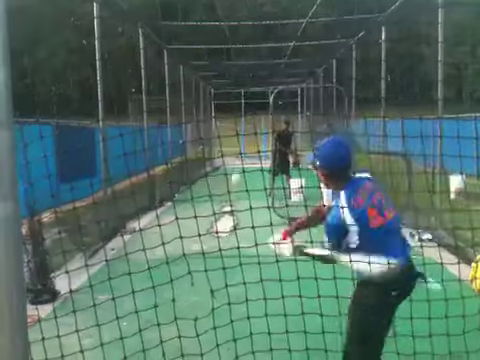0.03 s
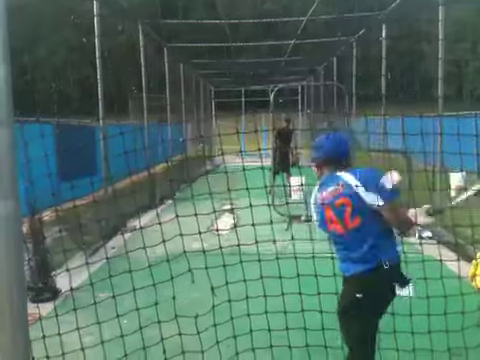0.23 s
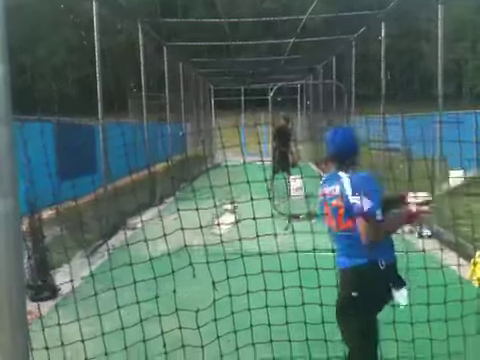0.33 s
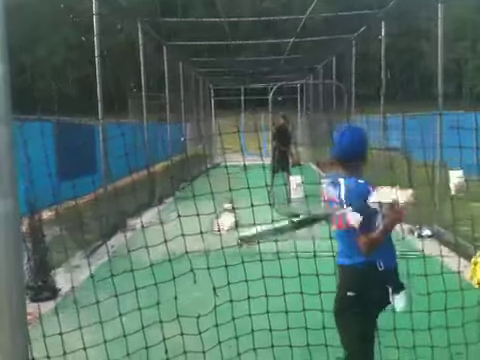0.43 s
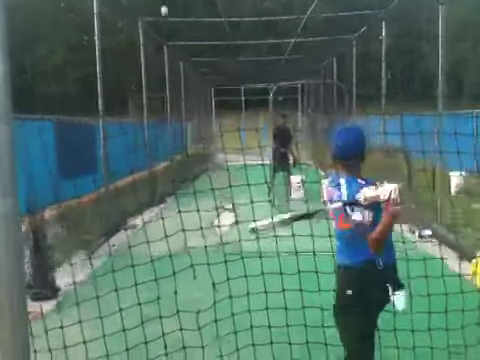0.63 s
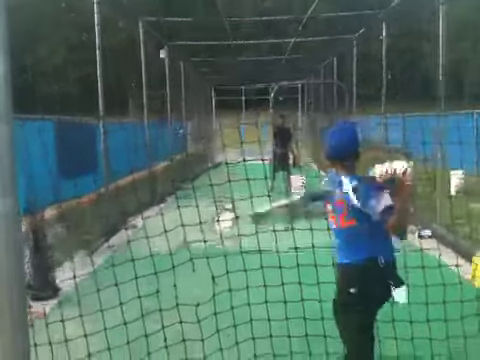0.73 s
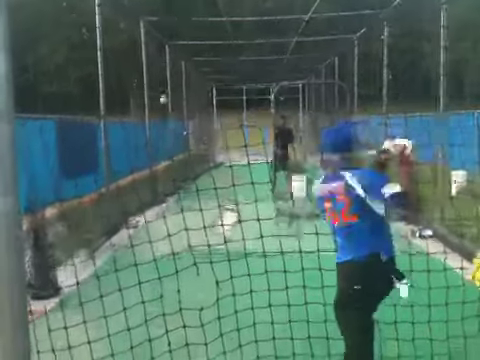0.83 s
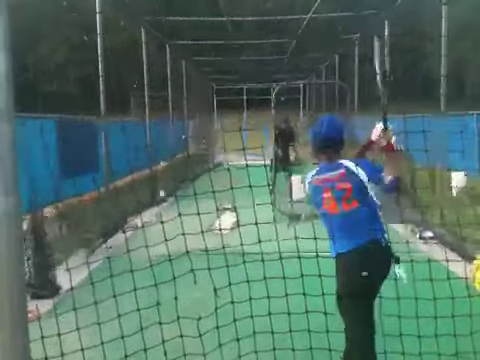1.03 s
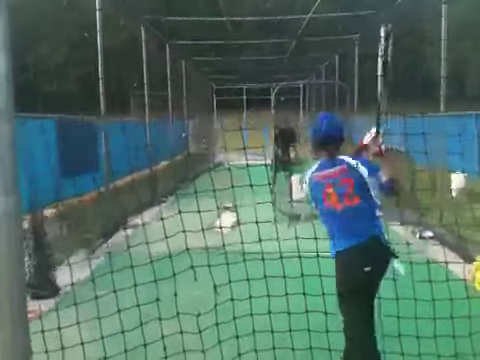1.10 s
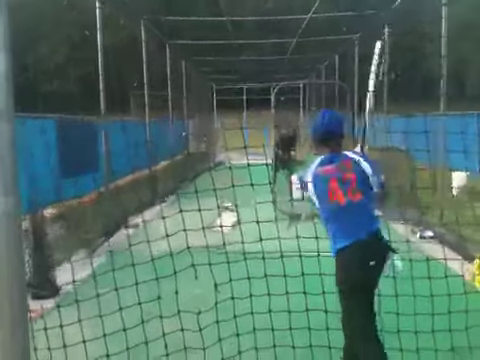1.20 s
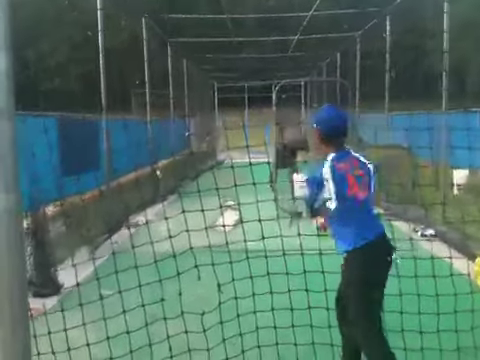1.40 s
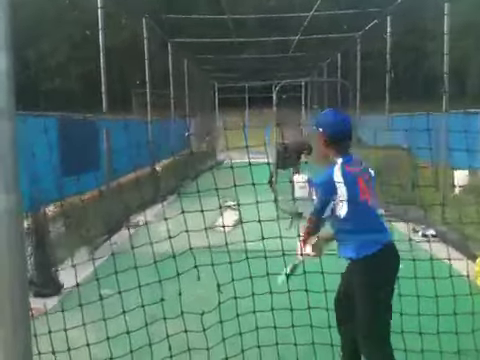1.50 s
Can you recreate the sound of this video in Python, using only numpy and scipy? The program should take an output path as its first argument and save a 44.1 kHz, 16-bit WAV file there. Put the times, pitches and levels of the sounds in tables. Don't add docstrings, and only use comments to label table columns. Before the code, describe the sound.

Sharp metallic bat hit with a short bending ring and clattery echoes, then a soft ball thud

```python
import sys
import numpy as np
from scipy import signal
from scipy.io import wavfile
from scipy.ndimage import uniform_filter1d

SR = 44100
rng = np.random.default_rng(int(sys.argv[2]) if len(sys.argv) > 2 else 0)


def materialize(psi):
    bounded = np.clip(np.atleast_2d(psi).T, -1, 1)
    quanta = np.round(bounded * 32767).astype(np.int16)
    wavfile.write(sys.argv[1], SR, quanta)


def convert_level_to_amplitude(level_db):
    exponent = np.asarray(level_db, float) / 20
    return 10 ** exponent


N = 68355
HIT_S, HIT_DB = 0.2081, -2


def evened(x):
    return x / np.sqrt(np.mean(x ** 2) + 1e-20)


def read(points, hz):
    f, value = np.transpose(points)
    return np.interp(np.log(hz + 1), np.log(f + 1), value)


def add(mix, s, sound):
    part = mix[round(s * SR):][:len(sound)]
    part += sound[:len(part)]


def band(x, hz, width):
    lo = np.sqrt(hz ** 2 + width ** 2 / 4) - width / 2
    hi = min(lo + width, SR / 2.2)
    return signal.sosfilt(signal.butter(2, [lo, hi], "band", fs=SR, output="sos"), x)


def ring(modes, t):
    return sum(convert_level_to_amplitude(db - 60 * t / t60) * np.sin(2 * np.pi * hz * t) for hz, db, t60 in modes)


def colour(points):
    gain = convert_level_to_amplitude(2 * read(points, np.linspace(0, SR / 2, 129)))
    pulse = signal.minimum_phase(signal.firwin2(255, np.linspace(0, 1, 129), gain))
    return pulse / np.linalg.norm(pulse)


def smoothed(x, first, second):
    return uniform_filter1d(uniform_filter1d(x, first, axis=0), second, axis=1)


def wash():
    # f/Hz, level/dB per Hz
    spectrum = [(60, -19), (220, -1), (700, -17), (1600, -17), (2900, -24), (4500, -18), (8000, -27),
                (16500, -30.5)]
    wash_db, patchy_db = -59, 1.2
    frames, hz = N // 128 + 5, np.fft.rfftfreq(512, 1 / SR)
    a, b, patches = rng.standard_normal((frames, 257, 3)).T
    patches = evened(smoothed(patches, 8, 20))
    z = (a + 1j * b) * convert_level_to_amplitude(read(spectrum, hz)[:, None] + patchy_db * patches)
    return convert_level_to_amplitude(wash_db) * evened(signal.istft(z, nperseg=512, noverlap=384)[1][:N])


def swishes():
    # start t/s, peak t/s, end t/s, level/dB, centre f/Hz, width f/Hz
    gusts = [(.11, .16, .187, -51.5, 2100, 1300), (.115, .15, .185, -59, 6200, 2500),
             (.125, .172, .19, -60, 11500, 8000), (.005, .018, .035, -56, 900, 2500),
             (.5, .6, .75, -62, 1300, 1800), (.92, 1.0, 1.085, -66, 6000, 10000),
             (.2035, .206, .209, -31, 4000, 12000), (1.02, 1.05, 1.075, -58, 1700, 900)]
    t, out = np.arange(N) / SR, np.zeros(N)
    for start, peak, end, db, hz, width in gusts:
        grain = convert_level_to_amplitude(2.5 * evened(uniform_filter1d(rng.standard_normal(N), 60)))
        swell = np.sin(np.pi / 2 * np.interp(t, [start, peak, end], [0, 1, 0]))
        out += convert_level_to_amplitude(db) * swell * evened(grain * band(rng.standard_normal(N), hz, width))
    return out


def footsteps():
    # centre t/s, length t/s, level/dB, f/Hz
    knocks = [(0.012, .012, -51, 240), (0.08, .03, -49.5, 170), (0.273, .025, -53.5, 200),
              (.9, .05, -51, 168)]
    # t/s, level/dB
    grit = [(0.132, -62), (0.164, -50), (0.945, -60), (.954, -53), (1.033, -55), (1.039, -44.5),
            (1.052, -44.5), (1.055, -42), (1.065, -46.5), (1.08, -60), (1.303, -53.5), (1.418, -52.5)]
    grit_t60_s = 0.011
    t, out = np.arange(N) / SR, np.zeros(N)
    for s, length, db, hz in knocks:
        out += convert_level_to_amplitude(db) * np.exp(-((t - s) / length) ** 2) * np.sin(2 * np.pi * hz * t)
    for s, db in grit:
        snap = rng.standard_normal(600) * convert_level_to_amplitude(-60 * t[:600] / grit_t60_s)
        body = 2 * band(snap, 1750, 600)
        add(out, s, convert_level_to_amplitude(db) * (band(snap, 6500, 9000) + body))
    return out


def barrel():
    barrel_hz = [670, 888, 1303, 1670, 2480, 3400, 4177, 5220, 5680, 6940, 8330, 9685, 10800, 15110]
    # level/dB, t60/s
    decays = [(-4.5, .03), (-9, 0.04), (2.5, 0.021), (-3, 0.029), (-10.5, 0.041), (-16, 0.063),
              (-6.5, 0.13), (-12, 0.08), (-18, 0.1), (-26.5, .06), (-24, 0.01), (-18, 0.36), (-13.5, .02),
              (-19, .02)]
    # f/Hz, level/dB, t60/s
    squash = [(476.3, -6, 0.015)]
    swell_s, turn_s = 0.0018, 0.015
    t, out = np.arange(SR // 5) / SR, np.zeros(N)
    modes = [(hz, db, t60) for hz, (db, t60) in zip(barrel_hz, decays)]
    envelope = (1 - np.exp(-t / swell_s)) * np.exp(-(t / turn_s) ** 4)
    add(out, HIT_S, convert_level_to_amplitude(HIT_DB) * envelope * (ring(modes, t) - ring(squash, t)))
    return out


def crack():
    # f/Hz, level/dB
    crack_spectrum = [(150, -30.5), (450, -9.5), (1000, -6), (1500, -5.5), (3000, -10), (4500, 1.5),
                      (11000, -12), (16500, -13.5)]
    crack_db, crack_t60_s, click_db, crush_hz = -6.5, 0.025, 9, 1800
    t, out = np.arange(2048) / SR, np.zeros(N)
    click = colour(crack_spectrum)
    burst = rng.standard_normal(2048) * convert_level_to_amplitude(-60 * t / crack_t60_s)
    burst = signal.sosfilt(signal.butter(2, crush_hz, "high", fs=SR, output="sos"), burst)
    blow = convert_level_to_amplitude(crack_db) * signal.lfilter(click, 1, burst)
    add(blow, 0, convert_level_to_amplitude(click_db) * click)
    add(out, HIT_S, convert_level_to_amplitude(HIT_DB) * blow)
    return out


def moving_note(rows, pitch):
    s, db = np.transpose(rows)
    t = np.arange(s[0], s[-1], 1 / SR)
    edge = np.clip(np.minimum(t - s[0], s[-1] - t) / 0.003, 0, 1)
    level = np.sqrt(2) * edge * convert_level_to_amplitude(np.interp(t, s, db))
    phase = 2 * np.pi * np.cumsum(np.interp(t, *np.transpose(pitch))) / SR
    return s[0], level * np.sin(phase)


def swinging_ping():
    # t/s, f/Hz
    direct = [(.21, -32), (.216, -11.5), (.224, -21.5), (.232, -11.5), (.24, -20.5), (.247, -36.5),
              (.251, -21.5), (.259, -27), (.285, -59.5)]
    direct_hz = [(.21, 1935), (.235, 1948), (.26, 1965)]
    # t/s, level/dB; then t/s, f/Hz
    fence = [(.235, -45.5), (.253, -28.5), (.266, -33.5), (.273, -49.5), (.28, -35.5), (.309, -45.5),
             (.313, -37.5), (.331, -38.5), (.336, -39)]
    fence_hz = [(.25, 2102), (.275, 2065), (.29, 2080), (.33, 2040)]
    # t/s, level/dB; then t/s, f/Hz
    far = [(.338, -37), (.345, -29.5), (.35, -34), (.382, -34.5), (.39, -57), (.397, -41), (.42, -41.5),
           (.455, -51), (.54, -68.5)]
    far_hz = [(.35, 2070), (.38, 2064), (.41, 2040), (.53, 1975)]
    # t/s, level/dB; then t/s, f/Hz
    last = [(.53, -78), (.58, -65.5), (.63, -55.5), (.66, -72), (.73, -70), (.76, -73)]
    last_hz = [(.55, 1898), (.65, 1905)]
    out = np.zeros(N)
    for rows, pitch in ((direct, direct_hz), (fence, fence_hz), (far, far_hz), (last, last_hz)):
        add(out, *moving_note(rows, pitch))
    return out


def scatter(stretch):
    # f/Hz, t60/s
    decay = [(200, 0.45), (600, 0.12), (1500, .2), (4000, 0.33), (8000, .25), (15000, 0.24)]
    scatter_db = 4
    hz, t, z = signal.stft(rng.standard_normal(SR + SR // 4), SR, nperseg=128)
    lumps = evened(smoothed(rng.standard_normal(z.shape[::-1]).T, 10, 3))
    fall = convert_level_to_amplitude(-60 * t / (stretch * read(decay, hz))[:, None])
    h = signal.istft(z * convert_level_to_amplitude(scatter_db * lumps) * fall, SR, nperseg=128)[1]
    return h / np.linalg.norm(h)


def returns():
    # f/Hz, level/dB
    return_spectrum = [(150, -20), (500, -1), (1100, 1), (2500, -5), (4500, -4), (7000, -12), (12000, -11),
                       (16500, -28.5)]
    # delay t/s, level/dB, smear t/s, top f/Hz
    echoes = [(0.0139, -17.5, 0.0045, 7000), (.027, -14.5, .005, 8900), (.047, -29, 0.018, 8100),
              (0.062, -26.5, .006, 4930), (.126, -22, 0.0061, 18000), (0.129, -21, 0.01, 16600),
              (.14, -23, 0.046, 9400)]
    cage_db, field_db = -0.5, -21
    out = np.zeros(N)
    blow = 2 * colour(return_spectrum)
    for delay, db, smear, top_hz in echoes:
        spread = rng.standard_normal(4000) * np.exp(-np.arange(4000) / SR / max(smear, 0.001) * 2)
        low_pass = signal.butter(1, min(top_hz, SR / 2.2), fs=SR, output="sos")
        dull = signal.sosfilt(low_pass, blow)
        add(out, HIT_S + delay, convert_level_to_amplitude(db) * np.convolve(dull, spread / np.linalg.norm(spread)))
    add(out, HIT_S + 0.003, signal.fftconvolve(blow, convert_level_to_amplitude(cage_db) * scatter(0.71)))
    add(out, HIT_S + 0.014, signal.fftconvolve(blow, convert_level_to_amplitude(field_db) * scatter(5)))
    return out


def frame_hum():
    beat_hz, beat_phase, rise_s = 20.5, 0.3, 0.089
    t, out = np.arange(N) / SR, np.zeros(N)
    throb = np.cos(np.pi * (beat_hz * t + beat_phase))
    tone = ring([(2097, -55.5, 3.2)], t)
    add(out, HIT_S, np.minimum(t / rise_s, 1) * throb * tone)
    return out


def thuds():
    # t/s, level/dB, share of thud and tick (0-1)
    landings = [
        (1.229, -24.5, 1.),
        (1.2508, -34.5, 0),
    ]
    # f/Hz, level/dB, t60/s
    turf = [(225, 2.5, 0.032), (2615, -19, 0.031), (3367, -8, .012), (1225, -3.5, .015), (398, -5, 0.012),
            (556, -0.5, 0.018)]
    tick_db, tick_t60_s = -18, 0.02
    t, out = np.arange(SR // 8) / SR, np.zeros(N)
    for s, db, low in landings:
        tick = convert_level_to_amplitude(tick_db - 60 * t / tick_t60_s) * band(rng.standard_normal(len(t)), 4500, 12000)
        body = low * ring(turf[:3], t) + ring(turf[3:], t)
        add(out, s, -convert_level_to_amplitude(db) * (np.minimum(t / 0.0006, 1) * body + low * tick))
    return out


def scene():
    bat = barrel() + crack() + swinging_ping() + returns() + frame_hum()
    near = swishes() + footsteps() + bat + thuds()
    low_cut = signal.butter(3, 170, "high", fs=SR, output="sos")
    return (wash() + signal.sosfilt(low_cut, near))[None]


def top_cut(x):
    return signal.sosfilt(signal.butter(12, 17080, fs=SR, output="sos"), x)


def record(dry):
    ceiling = 0.7
    clipped = dry / (1 + (dry / ceiling) ** 4) ** (1 / 4)
    low = signal.butter(2, 100, "high", fs=SR, output="sos")
    top = signal.cheby1(8, 0.5, 15600, fs=SR, output="sos")
    mix = signal.sosfilt(np.vstack([low, top]), clipped)
    return top_cut(mix)


dry = scene()
out = record(dry)
materialize(out)
```